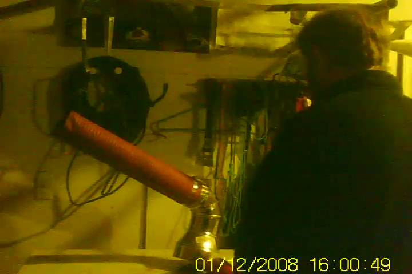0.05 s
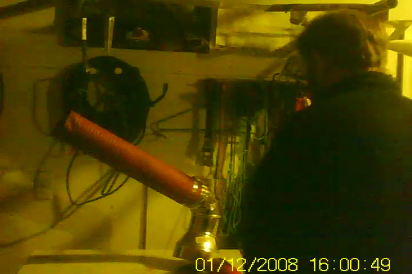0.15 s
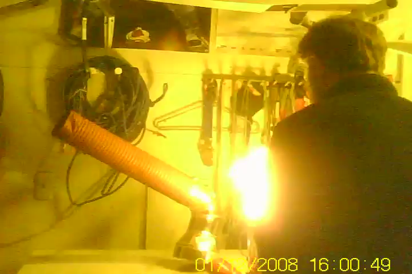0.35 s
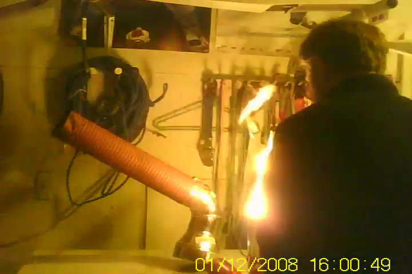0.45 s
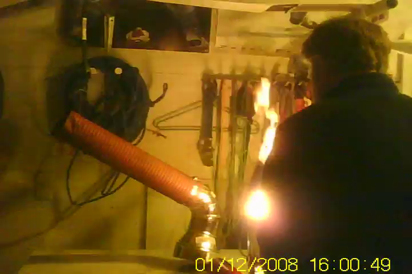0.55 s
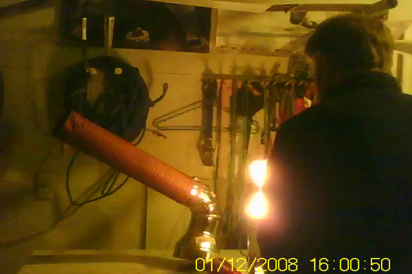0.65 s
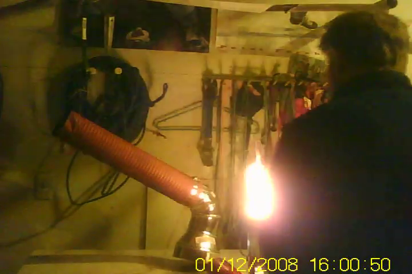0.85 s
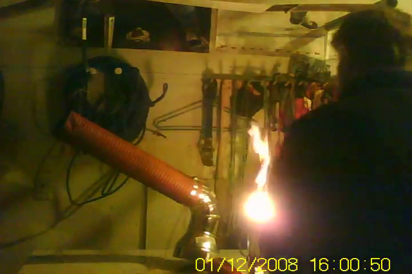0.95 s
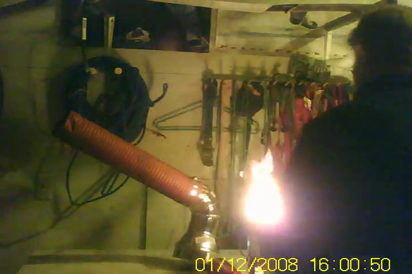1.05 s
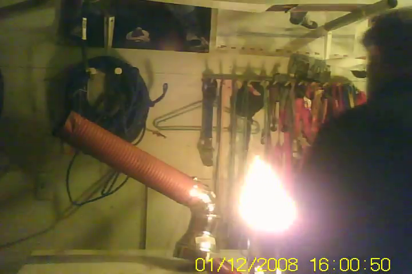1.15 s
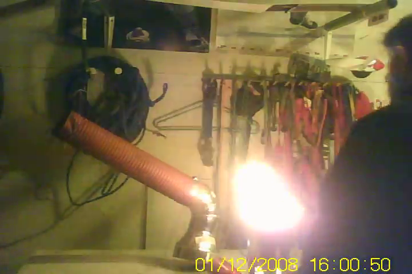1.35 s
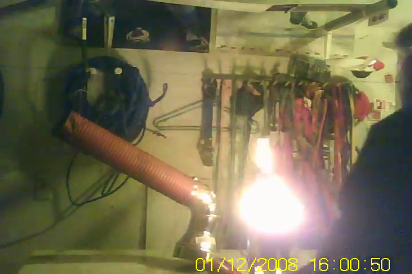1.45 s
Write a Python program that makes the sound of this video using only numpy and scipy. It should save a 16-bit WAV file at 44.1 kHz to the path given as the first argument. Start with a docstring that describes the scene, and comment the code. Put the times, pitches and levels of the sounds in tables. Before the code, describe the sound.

Burner lighting in a garage: a deep whoosh and thump, then a softer humming flame.

```python
"""Fuel burner lighting in a garage

One microphone among near walls. The vapour catches with a rising whoosh, and the flash thumps
the air of the room and the burner pipe. The flame settles into a fluttering roar that keeps
the pipe humming, and spits once. Behind it are a steady whine and the recorder's even hiss."""
import sys
import numpy as np
from scipy import signal
from scipy.fft import rfft, irfft
from scipy.io import wavfile

SR = 44100
rng = np.random.default_rng(int(sys.argv[2]) if len(sys.argv) > 2 else 0)


def master(y):
    """Save y as 16-bit WAV."""
    cut = np.clip(np.atleast_2d(y).T, -1, 1)
    pcm = np.round(cut * 32767)  # scale
    wavfile.write(sys.argv[1], SR, pcm.astype(np.int16))


N = 66150

# low background rumble and recorder hiss: f/Hz, relative level/dB
FLOOR_SPECTRUM = [(20, 4), (45, -4.5), (72, -4.5), (90, -8.5), (125, -4), (190, -15), (400, -17),
                  (700, -20), (1100, -24), (1750, -19), (2100, -26), (3000, -27.5), (3850, -22),
                  (4900, -30), (5750, -25.5), (6600, -29.5), (9000, -31.5), (10500, -36.5), (12000, -51.5)]
# tones of the whine: f/Hz, rms level/dB
WHINE_TONES = [(414.5, -64.5), (531.5, -62), (1534, -69.5), (1593, -57.5), (1642, -72), (1771, -75),
               (3774, -89), (7402, -83), (9598, -98)]
# first puff of flame: f/Hz, relative level/dB
PUFF_SPECTRUM = [(20, -6), (50, -25), (90, 13), (170, 6), (280, 10), (400, -30), (560, -2), (720, -33),
                 (1000, -48), (2500, -66)]
# dark whoosh of the flame front: f/Hz, relative level/dB
WHOOSH_SPECTRUM = [(20, 3), (50, 1.5), (75, 2), (100, -29), (160, -10), (270, 0), (400, -7), (650, -11.5),
                   (850, -33), (1200, -21), (2500, -75)]
# its brighter rush: f/Hz, relative level/dB
RUSH_SPECTRUM = [(300, -14), (700, 1), (1050, 1), (1280, -11), (1480, 6.5), (1680, -5.5), (2100, -17),
                 (4000, -39.5)]
# hiss of hot gas: f/Hz, relative level/dB
GAS_SPECTRUM = [(1200, -11.5), (2200, -4.5), (2900, 0), (3900, -3), (5000, -12.5), (6500, -12.5),
                (10000, -35)]
# air modes of room and pipe: f/Hz, level/dB, t60/s, build-up/s
AIR_MODES = [(27.2, -20, 0.556, 0.017), (118.3, -17, 0.36, 0.036), (175.6, -28, 0.34, 0.027),
             (244.7, -24.5, 0.2, .005), (264, -22, .15, 0.0038), (313.8, -31, 0.42, 0.0069),
             (366, -35, 0.25, 0.0041), (470, -45, 0.52, 0.028), (606.3, -51, 0.51, 0.03),
             (745, -38, 0.41, 0.023), (898.6, -49.5, 0.77, 0.017), (1426, -51.5, 0.39, .012),
             (1485, -32.5, .16, 0.0084)]
# course of the flame: t/s, roar level/dB, pipe hum level/dB
FLAME_LEVELS = [(.21, -98, -92), (.3, -47, -53), (.42, -44, -52), (.46, -41.5, -56), (0.502, -43.5, -43),
                (.575, -44, -45), (.625, -46.5, -62), (.665, -43.5, -49.5), (.81, -48.5, -50.5),
                (.9, -50, -59), (.98, -48.5, -57), (1.06, -47.5, -50), (1.16, -50, -58), (1.22, -50, -91),
                (1.3, -52.5, -57), (1.41, -49, -49.5), (1.5, -49.5, -56.5)]
# roar of the flame: f/Hz, relative level/dB
ROAR_SPECTRUM = [(20, 12.5), (35, 2.5), (60, 10), (90, -13), (160, -1.5), (210, -0.5), (290, 3.5),
                 (370, -3), (480, -4.5), (580, 0.5), (720, -3.5), (830, -8.5), (1250, -12.5), (1550, -4),
                 (1750, -7), (2100, -24.5), (4000, -28.5), (10000, -49)]
# flares in the pipe's upper resonances: t/s, half length/s, f/Hz, width/Hz, level/dB
PIPE_FLARES = [(.43, 0.029, 714, 105, -45), (0.823, 0.049, 540, 111, -53.5),
               (1.405, 0.045, 551, 148, -50.5)]
# fuel spitting: t/s, level/dB, t60/s
SPIT_EVENTS = [(0.526, -54, 0.074)]
# sizzle of the spit: f/Hz, relative level/dB
SPIT_SPECTRUM = [(1500, -27), (3300, 6), (5000, -6), (8000, -1), (11000, -21)]
# echoes off the near walls: delay/s, level/dB
WALL_ECHOES = [(.0047, -21.5), (.0083, -16), (0.0135, -22.5), (0.0206, -15.5)]


def undb(db):
    """Decibels to gain."""
    return 10 ** (np.asarray(db) / 20)


def shaped(gain):
    """Noise of rms 1 with a given gain at every frequency."""
    x = irfft(rfft(rng.standard_normal(N)) * gain, N)
    return x / x.std()


def noise(points):
    """Noise coloured by (Hz, dB) points."""
    hz, db = np.array(points, float).T
    f = np.maximum(np.fft.rfftfreq(N, 1 / SR), 1)
    return shaped(undb(np.interp(np.log(f), np.log(hz), db)))


def resonance(hz, width_hz):
    """Noise in one steep-sided resonance."""
    f = np.fft.rfftfreq(N, 1 / SR)
    return shaped(1 / (1 + (2 * (f - hz) / width_hz) ** 2))


def walk(rate):
    """Smooth chance with spread 1, changing about rate times a second."""
    return shaped(np.exp(-(np.fft.rfftfreq(N, 1 / SR) / rate) ** 2))


def tone(hz, wander_hz, flutter_db, rate):
    """A tone of rms near 1 that wavers in pitch and level."""
    phase = 2 * np.pi * (np.cumsum(hz + wander_hz * walk(rate)) / SR + rng.random())
    return np.sqrt(2) * np.sin(phase) * undb(flutter_db * walk(rate))


def burst(t, rise_s, hold_s, t60_s):
    """Grows by 60 dB up to time zero, holds, then dies away."""
    return np.exp(-np.log(1000) * (np.maximum(-t, 0) / rise_s + np.maximum(t - hold_s, 0) / t60_s))


def noise_floor():
    """Low background rumble and the recorder's even hiss."""
    return undb(-51.5) * noise(FLOOR_SPECTRUM)


def whine():
    """A steady background whine, roughened by a band of noise around its strongest tone."""
    tones = sum(undb(db) * tone(hz, wander_hz=1.34, flutter_db=0.46, rate=29) for hz, db in WHINE_TONES)
    return tones + undb(-62) * resonance(hz=1582, width_hz=80)


def ignition(t):
    """The vapour catches with a puff, the flame front whooshes through it, and hot gas hisses out."""
    catch_s, flash_s, gas_s = 0.236, 0.262, 0.268  # at the flash the whole cloud is alight
    puff = undb(-33) * noise(PUFF_SPECTRUM) * burst(t - catch_s, rise_s=0.064, hold_s=0, t60_s=0.22)
    whoosh = undb(-26.5) * noise(WHOOSH_SPECTRUM) * burst(t - flash_s, rise_s=0.11, hold_s=0, t60_s=0.47)
    rush = undb(-38) * noise(RUSH_SPECTRUM) * burst(t - flash_s, rise_s=0.064, hold_s=0.0067, t60_s=0.31)
    gas = undb(-49.5) * noise(GAS_SPECTRUM) * burst(t - gas_s, rise_s=0.11, hold_s=0, t60_s=0.28)
    flutter = undb(0.77 * walk(rate=100))
    return (puff + whoosh + rush) * flutter + gas


def thump(t):
    """The pressure of the flash swings once and sets the air in room and pipe ringing."""
    front_s = 0.252  # the pressure front arrives
    swing_s, swing_hz, half_s = 0.2645, 49.4, 0.013
    pulse = np.exp(-0.5 * ((t - swing_s) / half_s) ** 2)
    pressure = undb(-19.5) * np.cos(2 * np.pi * swing_hz * (t - swing_s)) * pulse
    age = np.maximum(t - front_s, 0)
    for hz, db, t60, build_s in AIR_MODES:
        swell = np.sin(np.pi / 2 * np.minimum(age / build_s, 1)) ** 2
        decay = np.exp(-np.log(1000) * age / t60)
        pressure += undb(db) * swell * decay * np.sin(2 * np.pi * hz * age)
    return pressure


def flame(t):
    """The flame roars and flutters, keeps the pipe humming and flares three times."""
    when, roar_db, hum_db = np.array(FLAME_LEVELS).T
    roar = noise(ROAR_SPECTRUM) * undb(np.interp(t, when, roar_db))
    hum = tone(hz=116.4, wander_hz=6.4, flutter_db=-0.3, rate=20.5) * undb(np.interp(t, when, hum_db))
    for at, half_s, hz, width_hz, db in PIPE_FLARES:
        flare = np.exp(-0.5 * ((t - at) / half_s) ** 2)
        roar += undb(db) * resonance(hz, width_hz) * flare
    flutter = undb(0.14 * walk(rate=35))
    return roar * flutter + hum


def spit(t):
    """Fuel spits in the flame with a short, faint sizzle."""
    return sum(undb(db) * noise(SPIT_SPECTRUM) * burst(t - at, rise_s=0.0062, hold_s=0, t60_s=t60)
               for at, db, t60 in SPIT_EVENTS)


def near_walls(direct):
    """Early echoes off the garage walls reach the microphone just behind the direct sound."""
    return direct + sum(undb(db) * np.roll(direct, int(delay_s * SR)) for delay_s, db in WALL_ECHOES)


def scene():
    """The burner and its background, heard from one spot in the garage."""
    t = np.arange(N) / SR
    echoed = near_walls(noise_floor() + ignition(t) + flame(t) + spit(t))
    return (echoed + thump(t) + whine())[None]


def record(dry):
    """The recorder cuts the top of the treble steeply."""
    cutoff_hz = 11600
    return signal.sosfilt(signal.butter(16, cutoff_hz, fs=SR, output="sos"), dry)


dry = scene()
out = record(dry)
master(out)
```